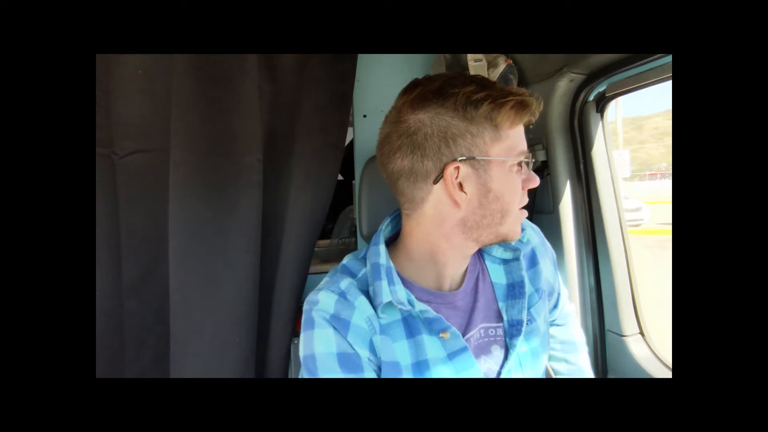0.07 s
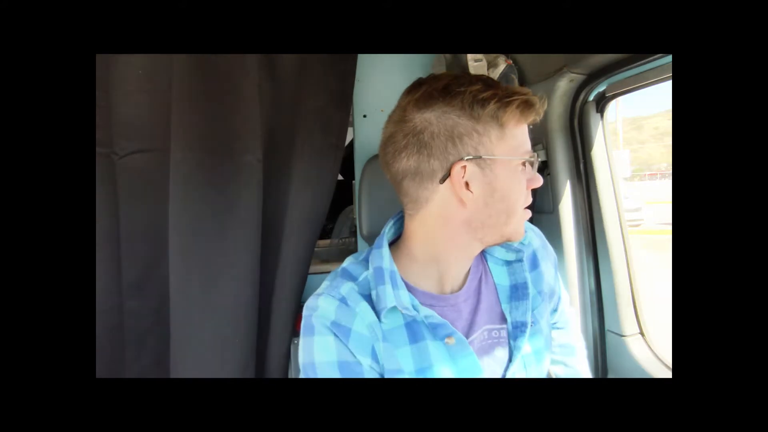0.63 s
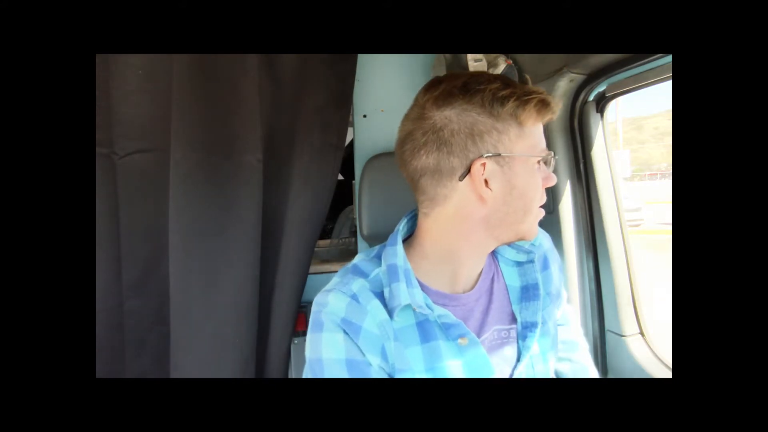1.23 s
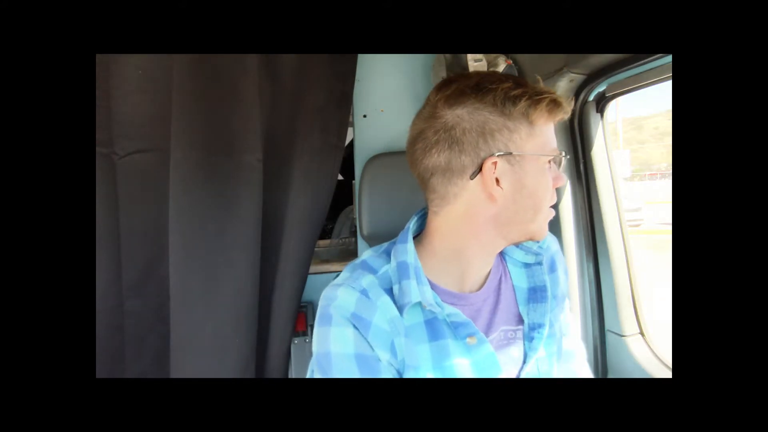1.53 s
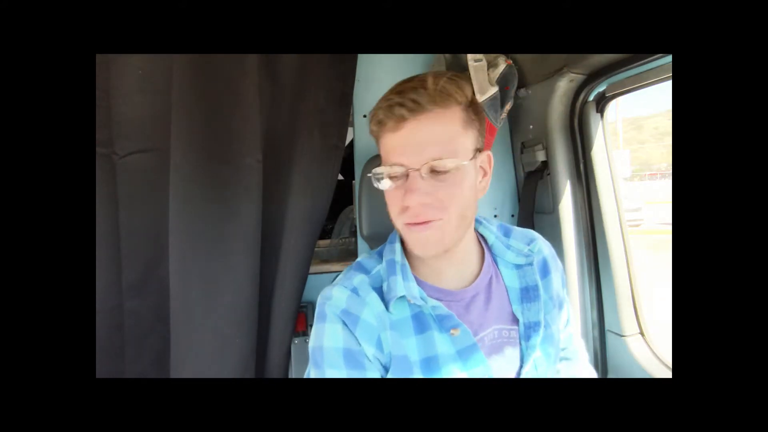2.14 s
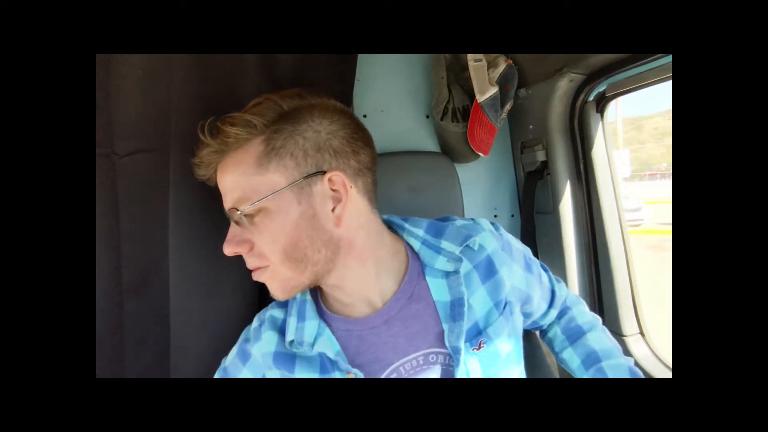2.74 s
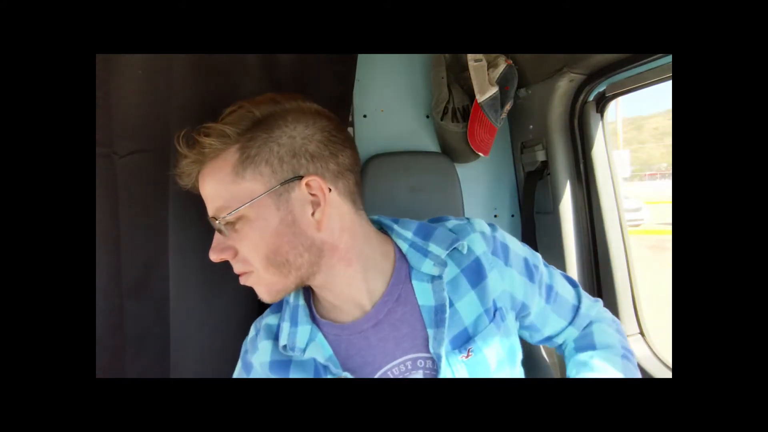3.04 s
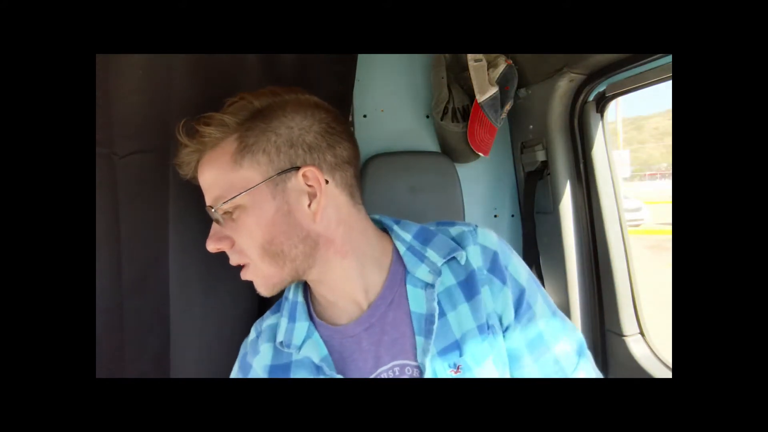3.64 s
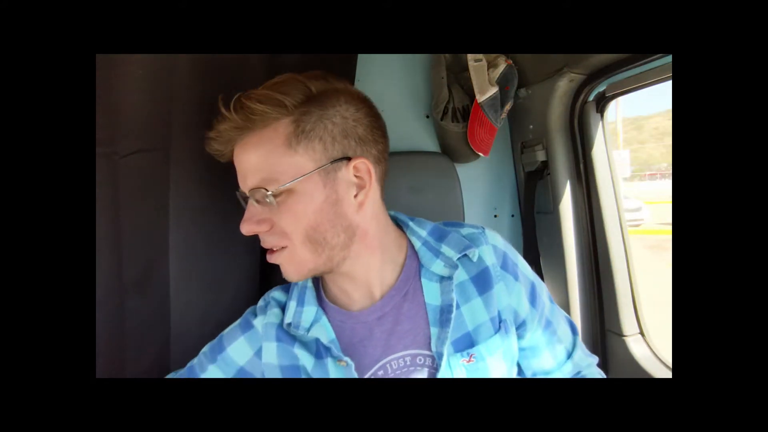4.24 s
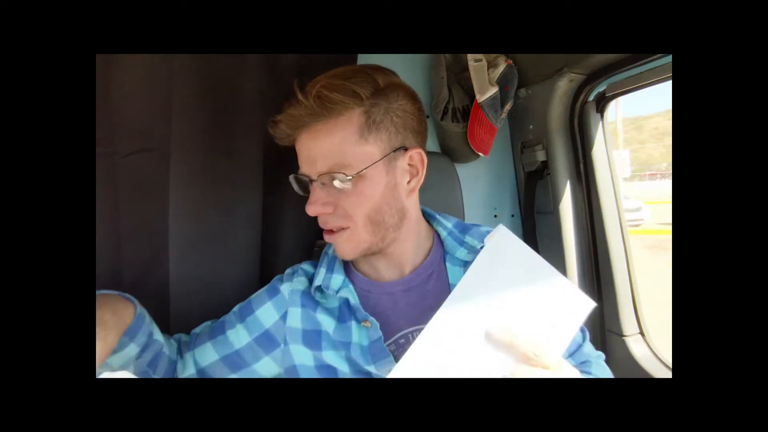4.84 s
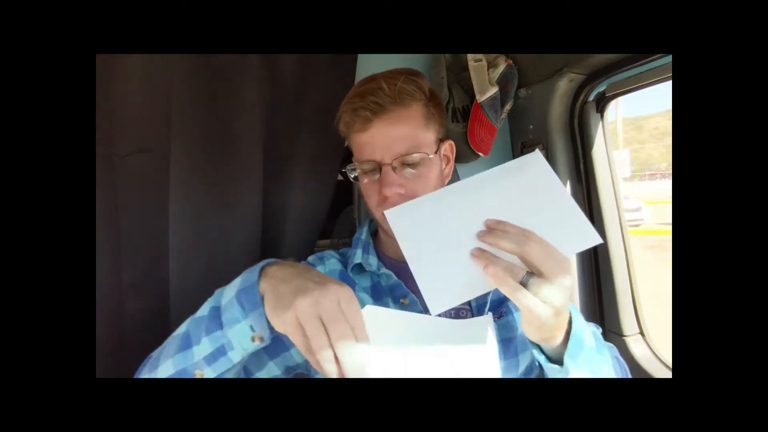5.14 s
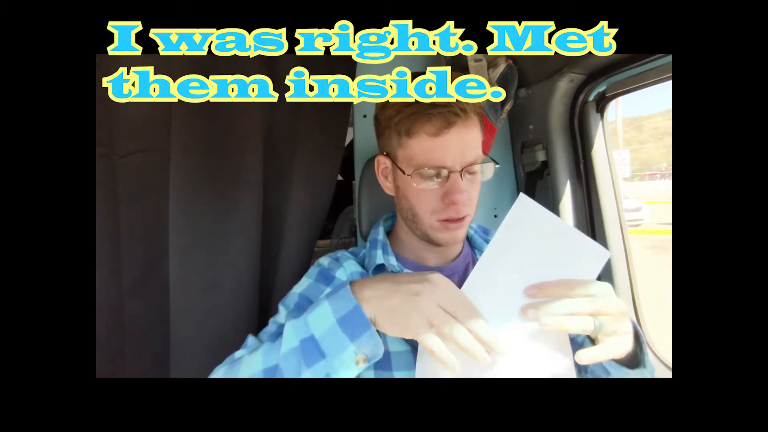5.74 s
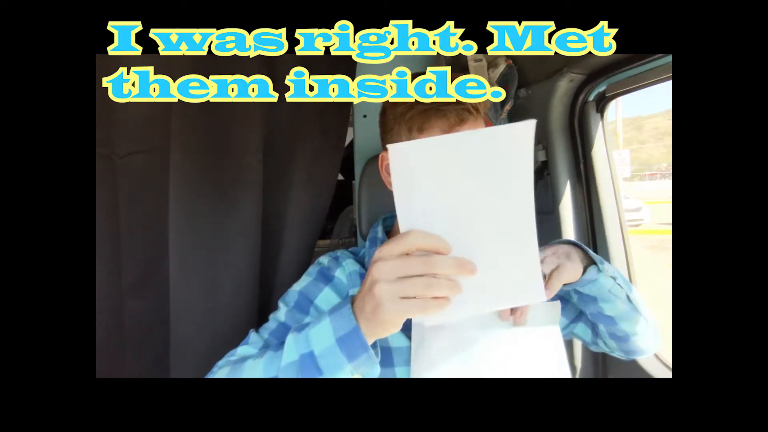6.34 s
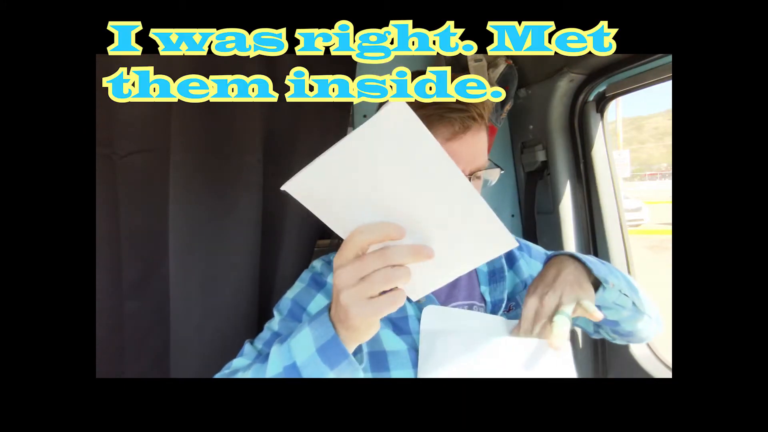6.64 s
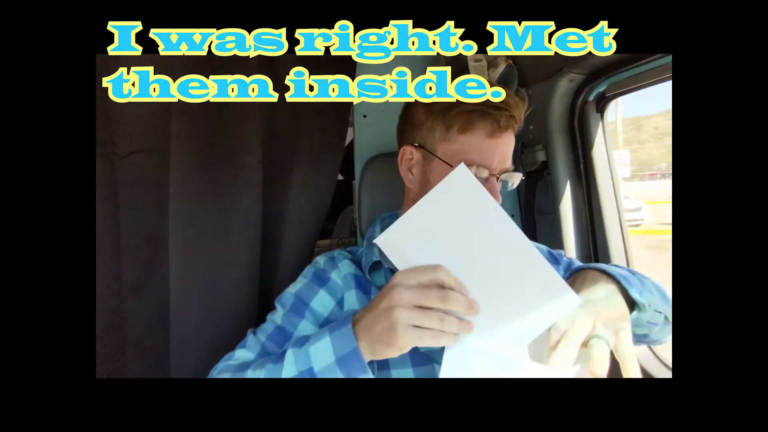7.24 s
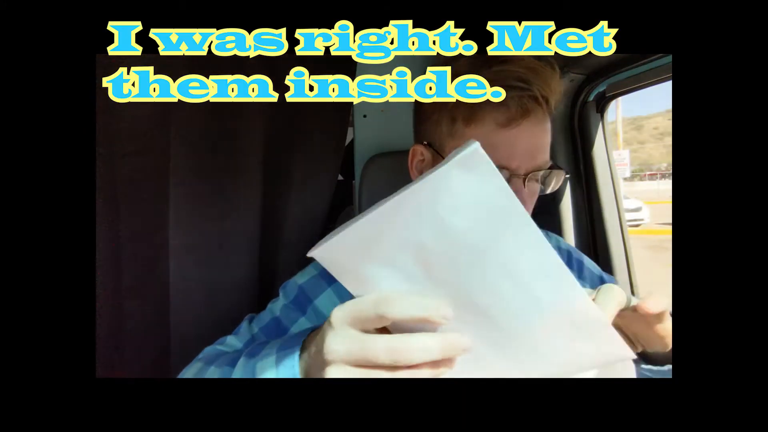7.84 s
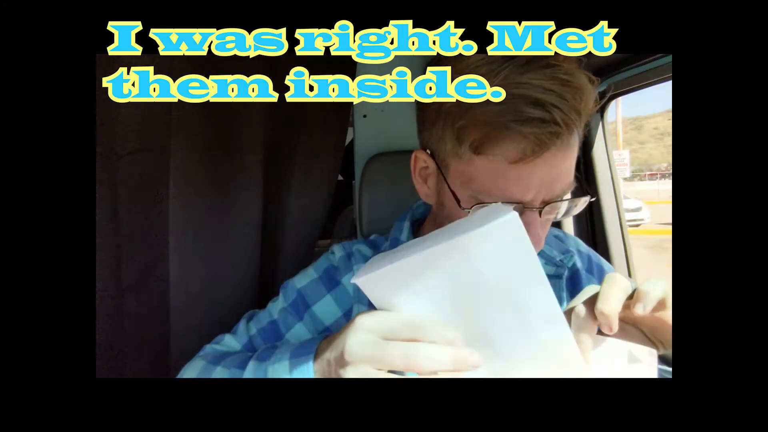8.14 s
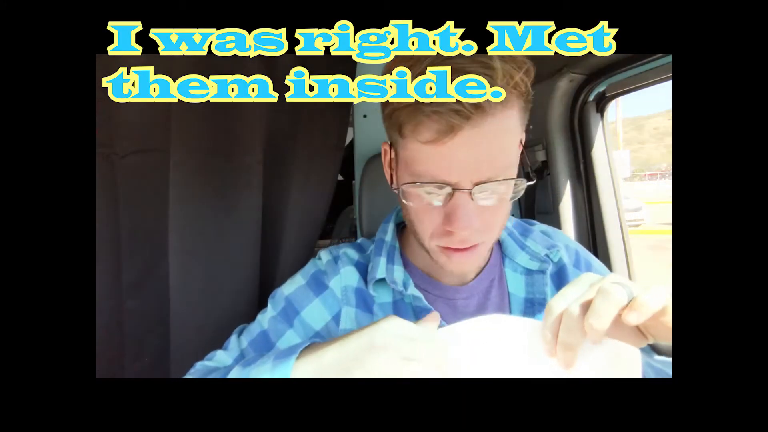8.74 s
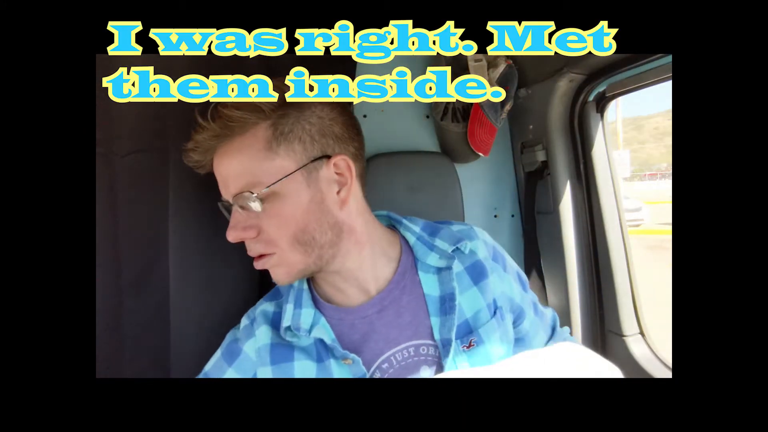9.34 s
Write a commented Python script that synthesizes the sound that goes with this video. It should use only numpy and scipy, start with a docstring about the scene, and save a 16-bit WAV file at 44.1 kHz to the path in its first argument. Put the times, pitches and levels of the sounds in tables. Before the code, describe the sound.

A faint, low engine hum and rumble run throughout inside a parked truck cab, with a slight hush of air and a barely audible low whine that slowly sinks. For the first three seconds, paper stirs very softly, with light rubbing and tiny pops. At about 3 seconds come the first crisp crackles, then a sharp snap at 3.5. From 4 to 5.6 seconds, sheets are picked up and shuffled close to the microphone, with loud crinkles, grainy swishes and, around 5 seconds, small dull pops of buckling paper. Somewhat softer sliding strokes and scattered snaps follow from 6 to 7.5 seconds. The rustling swells again between 7.7 and 8.7 seconds, then continues as short crackles and rubs until the end at about 9.5 seconds. The paper is mostly a little to the left and sounds close and nearly dry in the padded cab.

```python
"""In a parked truck cab, sheets of paper are picked up, leafed through and bent close to the microphone.
Stick-slip friction makes each stroke of sheet over sheet swell and fade with a grainy hiss.
Creases snap in short avalanches of slips, and slack paper buckles with small dull pops.
The padded cab adds a short tail. Underneath lie a running engine, a slowly sinking whine,
a low rumble, faint air noise and a thin whistle."""
import sys
import numpy as np
from scipy import signal
from scipy.fft import rfft, irfft, next_fast_len
from scipy.io import wavfile

SR = 44100
rng = np.random.default_rng(int(sys.argv[2]) if len(sys.argv) > 2 else 0)


def to_wav(s):
    """Save 16-bit WAV."""
    ch = np.atleast_2d(s).T  # columns
    pcm = np.round(np.clip(ch, -1, 1) * 32767)  # PCM
    wavfile.write(sys.argv[1], SR, pcm.astype(np.int16))


N = 418509


def from_db(db):
    """Amplitude ratio of a level in decibels."""
    return 10 ** (np.asarray(db) / 20)


def rms_one(x):
    """Normalisation to unit mean power."""
    return x / np.sqrt(np.mean(x ** 2) + 1e-20)


def in_time(rows):
    """Linear interpolation of each column of a curve, sample by sample."""
    times_s, *columns = np.transpose(rows)
    return [np.interp(np.arange(N) / SR, times_s, column) for column in columns]


def add(track, start_s, sound):
    """Superposition: a sound adds to a track from its start time."""
    at = round(start_s * SR)
    track[at:at + len(sound)] += sound[:N - at]


def band(x, low_hz, high_hz, order):
    """Band-pass filtering that conserves the power of white noise."""
    sos = signal.butter(order, [low_hz, min(high_hz, .47 * SR)], "band", fs=SR, output="sos")
    power_gain = np.mean(np.abs(signal.sosfreqz(sos, 4096)[1]) ** 2)
    return signal.sosfilt(sos, x) / np.sqrt(power_gain)


def flicker(per_s, spread_db):
    """Random amplitude modulation: a wandering gain of rms 1."""
    knots = rng.standard_normal(2000)
    wander = np.interp(np.arange(N) / SR * per_s, np.arange(len(knots)), knots)
    return rms_one(from_db(spread_db * wander))


def shaped_noise(spectrum, channels):
    """Spectral shaping of white noise into a steady noise of rms 1."""
    hz, db = np.transpose(spectrum)
    size = next_fast_len(N)
    log_hz = np.log(np.fft.rfftfreq(size, 1 / SR) + 1)
    gain = from_db(np.interp(log_hz, np.log(hz), db, left=-90, right=-90))
    white = rfft(rng.standard_normal((channels, size)))
    return rms_one(irfft(white * gain, size)[:, :N])


# Spectrum of the air noise: frequency_hz, relative_density_db
AIR_SPECTRUM = [(200, 13.5), (350, 4), (550, 3.5), (800, 2), (1300, 4.5), (2200, 3.5), (2800, -3),
                (3700, 3), (5200, -2), (6300, -1), (7500, -3), (10500, -2.5), (16000, -3)]
# Spectrum of the thin whistle: frequency_hz, relative_density_db
WHISTLE_SPECTRUM = [(840, -37), (880, 2), (894, -1), (908, -7), (950, -28)]
def air():
    """Broadband noise is heard as a hush, narrowband noise as a whistle."""
    hush = from_db(-66) * shaped_noise(AIR_SPECTRUM, channels=2)
    whistle = from_db(-81) * shaped_noise(WHISTLE_SPECTRUM, channels=1)
    return hush + whistle


# Spectrum of the cab's rumble: frequency_hz, relative_density_db
RUMBLE_SPECTRUM = [(10, -1), (20, 4), (28, 13.5), (38, -10), (60, 4), (90, -6.5), (150, -12.5), (215, -6),
                   (300, -20.5), (450, -23), (900, -61)]
def rumble():
    """Stationary low-frequency noise, coherent in both channels."""
    return from_db(-60.5) * shaped_noise(RUMBLE_SPECTRUM, channels=1)


# Line spectrum of the engine: pitch_hz, level_db
ENGINE_LINES = [(32.6, -64.5), (46.4, -55), (50.3, -63), (58.3, -55.5), (66.5, -62), (81.3, -84),
                (101.5, -72), (199, -81)]
# Swelling of its hum: time_s, gain_db
ENGINE_SWELL = [(0, -2), (1.5, 1), (2.3, -3.5), (3.5, -0.5), (4.5, 1.5), (6, 1), (7.2, -1.5), (8.3, 3),
                (9.49, -1)]
def engine():
    """Beating: closely spaced engine tones drift in and out of phase."""
    t = np.arange(N) / SR
    swell, = from_db(in_time(ENGINE_SWELL))
    tones = sum(from_db(db) * np.sin(2 * np.pi * (hz * t + rng.random())) for hz, db in ENGINE_LINES)
    return np.sqrt(2) * swell * tones


# Course of the sinking whine: time_s, pitch_hz, level_db
WHINE_GLIDE = [(0, 131.8, -73), (1.1, 128.5, -70), (1.8, 129.3, -61.5), (2.25, 127.8, -72),
               (2.9, 127.5, -61), (3.7, 122.5, -64.5), (4.3, 120.9, -62), (5.2, 122.5, -62),
               (6.8, 122.3, -69), (9.49, 120.8, -67)]
def whine():
    """A gliding tone: its phase is the integral of its frequency."""
    pitch_hz, level_db = in_time(WHINE_GLIDE)
    amplitude = np.sqrt(2) * from_db(level_db) * flicker(per_s=6, spread_db=3)
    return amplitude * np.sin(2 * np.pi * np.cumsum(pitch_hz) / SR)


def cab(x, t60_s, tail_db, low_cut_hz):
    """Reverberation: dense reflections from close walls are soon absorbed by seats and curtain."""
    t = np.arange(SR // 5) / SR
    tail = rng.standard_normal((2, len(t))) * from_db(-60 * t / t60_s) * (t > .002)
    tail = signal.sosfilt(signal.butter(2, low_cut_hz, "high", fs=SR, output="sos"), tail)
    tail /= np.sqrt(np.sum(tail ** 2, axis=1, keepdims=True))
    reflections = from_db(tail_db) * signal.oaconvolve(x, tail, axes=1)[:, :N]
    return (x + reflections) / np.hypot(1, from_db(tail_db))


# Colour of the paper at the microphone: centre_hz, width_hz, gain_db
PAPER_COLOUR = [(1880, 280, 1.5), (2820, 1400, 0), (3815, 620, 3.5), (5320, 1310, -5), (6260, 790, 6),
                (7350, 820, -5.5), (8370, 440, 2.5), (9370, 1160, -3), (10700, 850, 3), (11660, 1040, -5),
                (13500, 1000, 0), (14600, 1300, -4)]
def coloured(x):
    """Spectral colouration: a cascade of broad peaks and dips."""
    for centre_hz, width_hz, gain_db in PAPER_COLOUR:
        width, gain = np.tan(np.pi * width_hz / SR), from_db(gain_db / 2)
        tuning = -2 * np.cos(2 * np.pi * centre_hz / SR)
        numerator = [1 + width * gain, tuning, 1 - width * gain]
        x = signal.lfilter(numerator, [1 + width / gain, tuning, 1 - width / gain], x)
    return x


# Bearing of the paper: time_s, left_over_right_db (at a shading of 1), left_lag_ms
PAPER_BEARING = [(0, 15, -0.094), (3.6, 1.5, 0.0025), (4.1, -0.5, .24), (4.8, 0, 0.23), (5.4, 9, -0.086),
                 (7.7, 9, -0.097), (9.49, 11.5, -0.15)]
def port_gains(shading):
    """Acoustic shading: the two microphone ports differ in level."""
    pan_db, _ = in_time(PAPER_BEARING)
    return from_db(shading * pan_db * np.array([[.5], [-.5]]))


def at_microphone(sound, shading):
    """Path difference: direct sound reaches the two ports with a lag and a level step."""
    _, lag_ms = in_time(PAPER_BEARING)
    lag = np.round(lag_ms * SR / 1000).astype(int)
    left = sound[np.clip(np.arange(N) - lag, 0, N - 1)]
    return np.array([left, sound]) * port_gains(shading)


def radiate(power, coherence, shading):
    """Partial coherence: both ports share a random vibration's direct sound, not its scattered sound."""
    noise = np.sqrt(power) * rng.standard_normal((3, N))
    direct = at_microphone(noise[0], shading)
    scattered = noise[1:] * port_gains(shading)
    return np.sqrt(coherence) * direct + np.sqrt(1 - coherence) * scattered


# Slack paper buckling and soft handling knocks: start_s, level_db, pitch_hz, t60_s
BUCKLING_POPS = [(0.139, -55, 1200, 0.018), (0.292, -52, 1280, 0.025), (0.399, -54, 1000, 0.014),
                 (0.669, -42.5, 1420, 0.014), (0.887, -46.5, 1650, 0.025), (0.943, -62, 1350, 0.02),
                 (1.041, -58, 1640, 0.022), (1.072, -55.5, 1510, 0.022), (1.113, -51.5, 1040, 0.023),
                 (1.178, -60, 1350, 0.02), (1.301, -58, 1290, 0.019), (1.321, -53, 1000, 0.017),
                 (1.593, -50, 1150, 0.021), (1.698, -45, 1270, 0.03), (1.62, -57, 1300, .025),
                 (1.831, -46, 1180, 0.021), (2.092, -48.5, 1130, 0.012), (2.199, -52, 1260, 0.022),
                 (4.863, -32, 1530, 0.03), (4.918, -36.5, 1340, 0.017), (4.958, -37.5, 1580, 0.016),
                 (5.03, -30, 1180, 0.022), (5.061, -38.5, 1080, 0.028), (5.207, -37, 1880, 0.016),
                 (5.232, -24.5, 1140, 0.02), (5.274, -35, 1170, 0.025), (5.295, -32, 980, 0.013),
                 (5.332, -27, 977, 0.015), (5.572, -32, 1240, 0.025), (5.762, -45.5, 1830, 0.042),
                 (5.824, -44, 1780, 0.048), (5.971, -34.5, 1800, 0.024), (6.487, -38.5, 1800, 0.023),
                 (6.943, -31, 1000, 0.023), (7.769, -47, 1420, 0.018)]
def pops(ring_db, knock_db, tick_db, thud_db, tail_db, tail_t60_s):
    """Snap-through buckling: a patch flips with a damped ring, a tick, a thud and a lingering knock."""
    t = np.arange(SR // 8) / SR
    rings, power, lingering = np.zeros((3, N))
    rise = 1 - np.exp(-t / .0016)
    for start_s, level_db, pitch_hz, t60_s in BUCKLING_POPS:
        envelope = from_db(level_db - 60 * t / t60_s) * rise
        add(rings, start_s, envelope * np.sin(2 * np.pi * pitch_hz * t))
        add(power, start_s, envelope ** 2)
        add(lingering, start_s, (from_db(level_db + tail_db - 60 * t / tail_t60_s) * rise) ** 2)
    ring = from_db(ring_db) * at_microphone(rings, shading=.8)
    knock = band(radiate(power + lingering, coherence=1, shading=.6), 910, 1860, order=3)
    tick = band(radiate(power, coherence=.55, shading=.32), 2200, 5200, order=2)
    thud = band(radiate(power, coherence=.88, shading=.49), 230, 760, order=2)
    return ring + from_db(knock_db) * knock + from_db(tick_db) * tick + from_db(thud_db) * thud


# Creases snapping: start_s, body_db, crackle_db, hiss_db, decay_s
CREASE_SNAPS = [(0.139, -70, -58, -68, .003), (0.3, -66, -57, -71, .003), (0.4, -70, -57, -64, 0.0044),
                (0.94, -70, -59, -68, .002), (1.321, -71, -59.5, -70, 0.0018), (1.7, -62, -64, -62, .003),
                (2.917, -47.5, -46, -43, .005), (2.965, -45, -26.5, -38.5, 0.0024),
                (3.007, -42, -37.5, -50, .005), (3.085, -51, -36.5, -41, .005),
                (3.12, -48, -38, -62, 0.0036), (3.34, -71, -62, -62, 0.0024), (3.529, -25, -31, -41, 0.002),
                (3.535, -33, -19.5, -28.5, 0.0025), (3.575, -38, -32, -52, 0.002),
                (3.5928, -24.5, -31, -41, 0.0014), (3.69, -63, -55.5, -70, .004),
                (3.858, -86, -63, -60, 0.0041), (4.009, -40, -32, -36.5, 0.0072),
                (4.057, -32, -30.5, -44, .005), (4.082, -26.5, -18.5, -18.5, 0.0033),
                (4.127, -31, -29, -44, 0.0027), (4.179, -22.5, -23.5, -39, .003),
                (4.238, -31, -21, -37, 0.0032), (4.295, -29, -31.5, -64, .004),
                (4.351, -50, -39, -50, 0.0034), (4.581, -21, -21.5, -31, .005),
                (4.59, -30, -21.5, -37, 0.0032), (4.625, -43, -36, -33, 0.0032),
                (4.681, -43, -32, -42, 0.0055), (4.819, -46, -48, -64, .003),
                (5.4313, -25, -22.5, -20, 0.0019), (5.448, -29, -32, -48, .0024),
                (5.4924, -27, -22.5, -22.5, 0.0038), (5.505, -22.5, -21, -30, 0.0063),
                (5.695, -39.5, -37, -39, 0.0051), (5.86, -33, -37.5, -42.5, 0.0047),
                (6.068, -36.5, -43, -43, 0.0049), (6.365, -43.5, -37, -38, 0.004),
                (6.562, -42, -35.5, -29.5, .003), (6.699, -30.5, -30, -25.5, 0.0039),
                (6.726, -47, -33.5, -28.5, .0024), (6.831, -40, -40, -66, 0.0043),
                (6.864, -37, -38, -59, 0.004), (6.891, -31.5, -28.5, -52, .007),
                (7.02, -32, -34, -36.5, 0.0046), (7.353, -42, -48, -52, 0.0038),
                (7.529, -47.5, -43, -40, .0026), (7.672, -42, -45, -63, 0.0022),
                (7.687, -53, -35.5, -51, .002), (7.71, -41.5, -37.5, -62, 0.0055),
                (7.756, -49, -45, -37, 0.0015), (7.806, -30.5, -25, -44, 0.0062),
                (7.872, -25, -20.5, -44, .005), (7.936, -44, -25, -33, .0046),
                (7.944, -27, -22.5, -24, 0.002), (8.2, -31, -29, -35, 0.0049),
                (8.244, -32, -33, -51, 0.0015), (8.285, -24, -29.5, -38.5, 0.0018),
                (8.373, -32, -49, -50, 0.0015), (8.424, -30, -46, -54, .0016),
                (8.458, -38.5, -36.5, -35, 0.0094), (8.587, -42, -41, -40, 0.0026),
                (8.615, -27, -31.5, -46, .004), (8.631, -33, -41, -38, 0.0034),
                (8.664, -29.5, -29.5, -51, 0.0065), (8.739, -38, -32.5, -35.5, 0.0019),
                (8.908, -30, -31, -47, 0.004), (8.97, -41, -41, -64, 0.0015),
                (8.981, -31.5, -26.5, -40, 0.001), (8.997, -33, -28.5, -35, 0.0014),
                (9.071, -33, -33, -47, .003), (9.131, -35, -27, -30, 0.0021), (9.142, -45, -31, -42, .0012),
                (9.245, -35.5, -25, -25.5, 0.0011), (9.306, -37.5, -40, -44, .004),
                (9.389, -35, -27.5, -36.5, 0.0018), (9.413, -50, -32.5, -28, 0.00065)]
def snap_power(rise_s, equivalent_s):
    """Avalanches: each crease gives way in a burst of body, crackle and hiss power."""
    t, power = np.arange(SR // 12) / SR, np.zeros((3, N))
    for start_s, *levels_db, decay_s in CREASE_SNAPS:
        burst = (1 - np.exp(-t / rise_s)) ** 2 * np.exp(-t / decay_s)
        burst *= equivalent_s * SR / burst.sum()   # same energy whatever the decay
        for track, level_db in zip(power, levels_db):
            add(track, start_s, from_db(level_db) ** 2 * burst)
    return power


def cracks(ring_db, click_db, facet_hz, octaves_per_db, spread_octaves, t60_cycles, delay_s):
    """Impulse excitation: the biggest slip of a snap clicks and rings the facet beside it."""
    t = np.arange(SR // 50) / SR
    rings, clicks = np.zeros((2, N))
    for start_s, body_db, crackle_db, hiss_db, decay_s in CREASE_SNAPS:
        octaves = octaves_per_db * (hiss_db - body_db)   # bright snaps ring higher
        pitch_hz = facet_hz * 2 ** (octaves + spread_octaves * rng.standard_normal())
        strength = 1 / np.hypot(1, decay_s / .0018)   # quick snaps put most into this slip
        envelope = strength * from_db(crackle_db - 60 * pitch_hz * t / t60_cycles)
        add(rings, start_s + delay_s, envelope * np.sin(2 * np.pi * pitch_hz * t))
        add(clicks, start_s + delay_s, strength * from_db([hiss_db]))
    direct = from_db(ring_db) * rings + from_db(click_db) * band(clicks, 4000, 10400, order=2)
    return at_microphone(direct, shading=.23)


def dents(per_s, spread_db, t60_cycles):
    """Damped resonance: tiny dents flip at random, each ringing at one of twelve pitches; rms 1."""
    sizes = from_db(spread_db * np.minimum(rng.exponential(1, N), 3)) * rng.choice([-1, 1], N)
    flips = sizes * (rng.random(N) < per_s / SR)
    pitches_hz = np.geomspace(950, 2000, num=12)
    pitch_index = rng.integers(0, len(pitches_hz), N)
    rings = np.zeros(N)
    for k, hz in enumerate(pitches_hz):
        radius, angle = from_db(-60 * hz / (t60_cycles * SR)), 2 * np.pi * hz / SR
        resonator = [1, -2 * radius * np.cos(angle), radius ** 2]
        rings += signal.lfilter([1, 0, -1], resonator, flips * (pitch_index == k) + 1e-18)
    return rms_one(rings)


# Motion of whole sheets, relative to the bending drive: time_s, flap_db, flex_db
SHEET_MOTION = [(0, -8.5, -12), (2.9, -9.5, -8), (3.55, -20.5, -20.5), (4.2, -18.5, -11.5),
                (4.6, -22, -8.5), (5.5, -17.5, -15.5), (6.7, -19.5, -14), (7.05, -11.5, -14.5),
                (7.85, -16, -14), (8.3, -20, -21), (9.49, -14.5, -16)]
def flapping(bending):
    """Plate radiation: the whole sheet pushes air, with a low flap and a hollow flexing above it."""
    flap_gain, flex_gain = from_db(in_time(SHEET_MOTION))
    push = radiate(bending, coherence=.81, shading=.49)
    flap = from_db(-3.5) * band(push, 245, 555, order=1) + from_db(-7) * band(push, 178, 277, order=1)
    flex = band(radiate(bending, coherence=.25, shading=1), 630, 1180, order=2)
    return flap_gain * flap + flex_gain * flex


# The held sheet rings higher as it is bent tighter: time_s, pitch_hz
BENDING_PITCH = [(0, 1430), (1.5, 1340), (2.3, 1200), (3.6, 1280), (4.1, 1620), (5.2, 1290), (5.76, 1650),
                 (6.7, 1620), (6.98, 1440), (7.3, 1550), (8.4, 1590), (8.6, 1410), (9.49, 1500)]
def sheet_body(bending, log_width):
    """Bending modes: broad resonances flicker, and those near the sheet's present pitch respond most."""
    pitch_hz, = in_time(BENDING_PITCH)
    edges_hz = np.geomspace(880, 2150, num=6)
    centres_hz = np.sqrt(edges_hz[1:] * edges_hz[:-1])
    weights = np.exp(-.5 * (np.log(centres_hz[:, None] / pitch_hz) / log_width) ** 2)
    weights /= np.sqrt(np.sum(weights ** 2, axis=0))
    body = np.zeros((2, N))
    for weight, low_hz, high_hz in zip(weights, edges_hz, edges_hz[1:]):
        gain = weight * flicker(per_s=45, spread_db=3)
        body += gain * band(radiate(bending, coherence=.85, shading=.46), low_hz, high_hz, order=2)
    return body


def shifting_band(x, low_hz, high_hz, per_s, spread_db):
    """Moving excitation: the halves of a band flicker separately as the contact wanders over the sheet."""
    whole = band(x, low_hz, high_hz, order=3)
    crossover = signal.butter(3, np.sqrt(low_hz * high_hz), fs=SR, output="sos")
    lower = signal.sosfiltfilt(crossover, whole)
    return flicker(per_s, spread_db) * lower + flicker(per_s, spread_db) * (whole - lower)


def crease_crackle(creasing):
    """Acoustic emission: slipping creases and edges crackle in the low treble."""
    vibration = radiate(creasing, coherence=.12, shading=.2)
    return shifting_band(vibration, 2105, 5300, per_s=40, spread_db=1.74)


# Finest hiss, above 10 kHz, relative to the hiss below it: time_s, level_db
FINE_HISS = [(0, 0), (2.5, 3), (3.5, -3), (4.15, -2.5), (4.7, -0.5), (7.2, -.5), (7.9, -1.5), (8.3, -0.5),
             (9.49, -0.5)]
def surface_hiss(rubbing):
    """Roughness noise: rubbed surface fibres hiss in two bands that share the power."""
    fine_gain, = from_db(in_time(FINE_HISS))
    vibration = radiate(rubbing, coherence=.05, shading=.24)
    hiss = shifting_band(vibration, 4310, 9600, per_s=30, spread_db=2.1)
    shimmer = flicker(per_s=37, spread_db=2)
    fine = shimmer * band(radiate(rubbing, coherence=.05, shading=0), 10260, 15750, order=3)
    return (hiss + fine_gain * fine) / np.hypot(1, fine_gain)


def grain(per_s, spread_db, decay_s, share):
    """Shot noise: a share of the power comes in fibre slips of uneven size; mean 1."""
    occurs = rng.random(N) < per_s / SR
    sizes = from_db(spread_db * np.minimum(rng.exponential(1, N), 3))
    power = signal.lfilter([1], [1, -np.exp(-1 / (decay_s * SR))], occurs * sizes ** 2 + 1e-18)
    return 1 - share + share * power / power.mean()


# Steady rubbing of the sheets in the hands: time_s, level_db
GRIP_RUBBING = [(0, -73.5), (2.5, -75.5), (2.85, -74), (3.95, -72.5), (4.05, -46.5), (4.45, -52),
                (4.84, -60), (5.01, -62.5), (5.2, -52), (6.1, -43.5), (6.45, -52), (7.0, -48.5),
                (7.21, -55), (7.66, -53.5), (8.57, -46.5), (8.73, -65), (8.85, -64.5), (8.95, -52.5),
                (9.49, -50)]
# One sheet sliding over another: start_s, swell_s, fade_s, body_db, crackle_db, hiss_db
SLIDING_STROKES = [(0.0, 0.0027, 0.059, -55.5, -60.5, -63), (0.05, 0.047, 0.29, -74, -68, -66),
                   (0.48, 0.094, 0.1, -66.5, -68, -69), (0.61, 0.083, 0.038, -58.5, -62, -63.5),
                   (0.87, 0.026, .09, -64, -65, -67), (1.05, 0.18, .25, -65, -66.5, -67.5),
                   (1.55, .16, .08, -59, -58.5, -61.5), (1.825, 0.022, 0.083, -63, -65, -67),
                   (1.98, 0.091, 0.12, -66, -65.5, -65), (2.19, .03, 0.2, -66, -63.5, -65),
                   (2.34, 0.15, .1, -65, -63, -59), (2.855, .02, 0.2, -58, -48, -49.5),
                   (2.97, 0.048, 0.067, -62, -48.5, -52.5), (3.053, 0.033, 0.047, -55.5, -45, -44.5),
                   (3.11, 0.031, 0.057, -63, -55, -62), (3.521, 0.0094, 0.11, -36.5, -35.5, -45),
                   (3.57, 0.038, 0.023, -48, -39.5, -47.5), (4.004, 0.0083, 0.065, -46, -39.5, -47),
                   (4.05, .035, 0.034, -35, -30, -56), (4.12, 0.037, 0.06, -34, -33, -49),
                   (4.195, 0.018, 0.13, -31.5, -31.5, -40.5), (4.47, 0.083, 0.029, -40.5, -37, -42),
                   (4.565, .015, 0.071, -32.5, -32.5, -40), (4.645, 0.042, 0.13, -39, -34, -36),
                   (4.85, 0.057, 0.076, -51.5, -51, -53), (5.03, 0.021, 0.18, -56, -59, -59),
                   (5.212, 0.019, 0.045, -39.5, -42.5, -58), (5.413, 0.019, 0.12, -31, -31.5, -32.5),
                   (5.48, 0.032, 0.071, -34, -32, -35), (5.61, 0.095, 0.055, -55, -48, -51),
                   (5.8, 0.074, 0.13, -50, -61, -64), (6.005, 0.02, 0.029, -43.5, -44, -41.5),
                   (6.03, .21, .21, -54, -50, -47), (6.45, 0.086, .13, -47.5, -44, -46.5),
                   (6.59, .11, 0.08, -40.5, -39.5, -41), (6.83, .075, 0.043, -42.5, -38.5, -46),
                   (7.04, 0.071, .065, -42, -35.5, -37.5), (7.22, 0.12, 0.13, -52, -47, -48),
                   (7.429, 0.086, .09, -46.5, -41.5, -45), (7.74, 0.079, 0.03, -37, -34.5, -49),
                   (7.815, 0.052, 0.035, -33.5, -33, -34.5), (7.895, 0.012, 0.096, -31.5, -32.5, -40.5),
                   (8.065, 0.034, 0.072, -58, -46.5, -48), (8.119, 0.17, .055, -35.5, -35.5, -43.5),
                   (8.28, 0.081, 0.1, -42, -39, -39), (8.589, 0.051, 0.051, -40, -37, -36),
                   (8.735, 0.016, .06, -52.5, -49, -59), (8.87, .038, 0.019, -47.5, -46, -47.5),
                   (9.035, 0.031, 0.04, -52, -54, -53), (9.125, 0.028, 0.11, -45.5, -41, -38.5),
                   (9.195, 0.039, 0.05, -46.5, -39.5, -38), (9.32, 0.073, .04, -48.5, -54, -58),
                   (9.44, .05, .05, -50, -48, -48)]
def slide_power(speed_exponent, grip_body_db, grip_hiss_db):
    """Sliding friction: body, crackle and hiss power follow each stroke's speed, over the grip's rub."""
    t = np.arange(N) / SR
    grip_db, = in_time(GRIP_RUBBING)
    power = from_db([grip_db + grip_body_db, grip_db, grip_db + grip_hiss_db]) ** 2
    for start_s, swell_s, fade_s, *levels_db in SLIDING_STROKES:
        length_s = swell_s + fade_s
        ramp = np.interp(t[:int(length_s * SR)], [0, swell_s, length_s], [0, 1, 0])
        speed = np.sin(np.pi / 2 * ramp)
        for track, level_db in zip(power, levels_db):
            add(track, start_s, (from_db(level_db) * speed ** speed_exponent) ** 2)
    return power


def rustle(body_db, crackle_db, hiss_db, dent_db):
    """Forced vibration: stick-slip and snaps drive the sheet from its low flap up to its surface hiss."""
    crinkles = grain(per_s=70, spread_db=3.5, decay_s=.0054, share=.11)
    slips = grain(per_s=700, spread_db=5.5, decay_s=.0024, share=.41)
    sliding = crinkles * slide_power(speed_exponent=1.41, grip_body_db=-3, grip_hiss_db=-1)
    bending, creasing, rubbing = sliding * slips + snap_power(rise_s=.00017, equivalent_s=.0074)
    flap = flapping(bending)
    body_amplitude = np.sqrt(sliding[0])
    denting = body_amplitude * dents(per_s=220, spread_db=4, t60_cycles=19)
    body = from_db(body_db) * sheet_body(bending, log_width=.29)
    body += from_db(dent_db) * at_microphone(denting, shading=.93)
    crackle = from_db(crackle_db) * crease_crackle(creasing)
    hiss = from_db(hiss_db) * surface_hiss(rubbing)
    return flap + body + crackle + hiss


def scene():
    """Superposition: the paper and its reflections add to the steady sounds of the cab."""
    paper = rustle(body_db=-1.48, crackle_db=-2.5, hiss_db=1.5, dent_db=-10)
    paper += cracks(ring_db=6.5, click_db=17, facet_hz=3450, octaves_per_db=.017, spread_octaves=.15,
                    t60_cycles=24, delay_s=.0012)
    paper += pops(ring_db=3, knock_db=.5, tick_db=-11, thud_db=-10, tail_db=-13.5, tail_t60_s=.11)
    air_noise = air()
    paper_in_cab = coloured(cab(paper, t60_s=.039, tail_db=-7, low_cut_hz=1000))
    return air_noise + engine() + whine() + rumble() + paper_in_cab


def record(dry):
    """Band limiting: a steep low-pass filter removes the highest treble."""
    cutoff_hz = 15900
    return signal.sosfilt(signal.ellip(12, .1, 80, cutoff_hz, fs=SR, output="sos"), dry)


dry = scene()
out = record(dry)
to_wav(out)
```